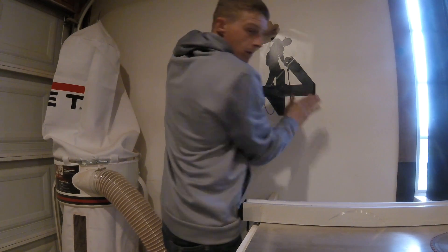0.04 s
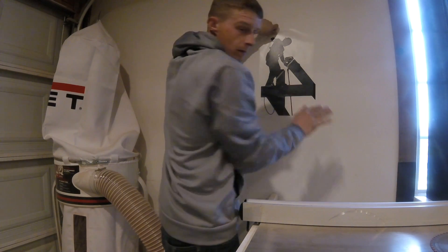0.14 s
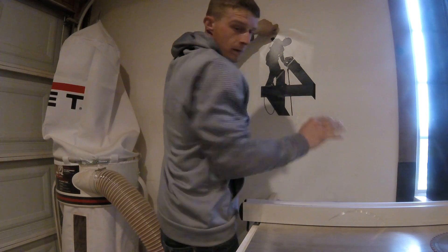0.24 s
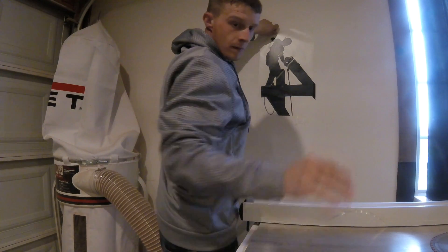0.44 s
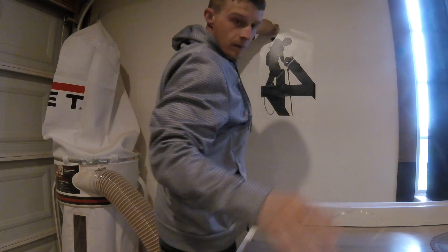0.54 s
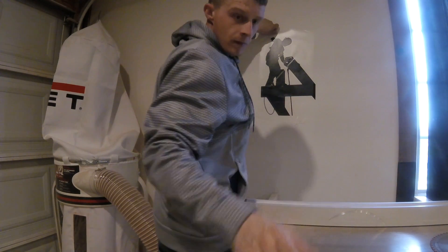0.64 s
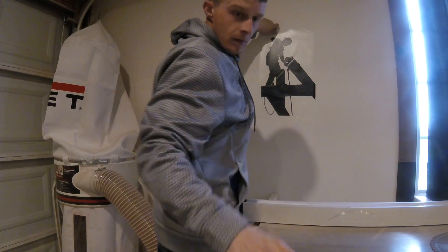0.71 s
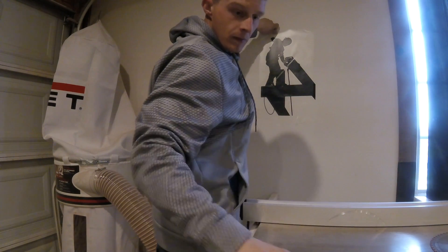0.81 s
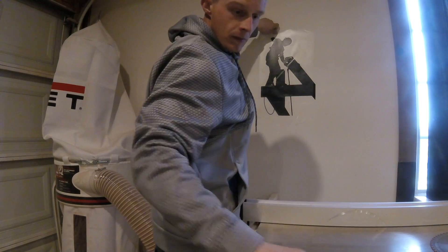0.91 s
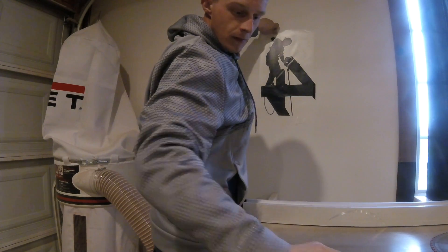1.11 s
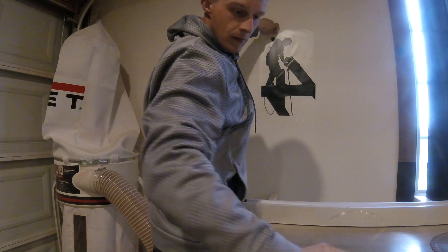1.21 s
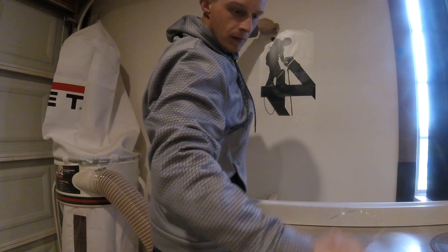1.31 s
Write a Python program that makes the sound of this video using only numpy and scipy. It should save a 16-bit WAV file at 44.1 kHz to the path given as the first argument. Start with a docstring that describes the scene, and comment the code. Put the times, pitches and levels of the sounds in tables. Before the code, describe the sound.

At about 0.2 seconds a hand slaps paper against a wall, one sharp crack with a faint short squeak and soft low bumps, ringing through a bare garage for under a second. From about 1.0 to 1.35 seconds, paper and a sleeve rustle, quieter and drier, with a few crisp crinkles and a soft bump. A faint wavering low hum, room noise and thin hiss lie underneath.

```python
"""A bare garage, heard through one microphone. A hand finishes pressing paper-backed vinyl onto the wall.
There is a short stick-slip squeak and one sharp slap, whose quick, hard contacts ring through the room.
Then paper and sleeve rustle in tiny slips, much drier than the slap, with a few crinkles and soft bumps.
Under it lie a wavering low hum, faint drones, room noise and a thin hiss."""
import sys
import numpy as np
from scipy import signal
from scipy.fft import rfft, irfft
from scipy.io import wavfile
from scipy.ndimage import uniform_filter1d

SR = 44100
rng = np.random.default_rng(int(sys.argv[2]) if len(sys.argv) > 2 else 0)


def inscribe(sig):
    """Save sig as 16-bit PCM at rate SR to the path in sys.argv[1].

    A 1-D sig is mono; a 2-D sig holds one channel per row.
    Samples are clipped to [-1, 1] before scaling.
    """
    pcm = np.round(np.clip(np.atleast_2d(sig).T, -1, 1) * 32767)
    wavfile.write(sys.argv[1], SR, pcm.astype(np.int16))


N = 59535
T = np.arange(N) / SR
FREQS = np.maximum(np.fft.rfftfreq(2 * N, 1 / SR), 1)


# The hard contacts of the slap. Each row: start in seconds, relative level in dB, decay in seconds.
SLAP_CONTACTS = [(.189, -32, 0.017), (0.2003, -7.5, 0.019), (.209, 1, 0.0035), (0.213, -1, 0.0043)]
# The slap's tone at the microphone. Each row: frequency in Hz, relative density in dB.
SLAP_SPECTRUM = [(180, -11), (255, -5.5), (370, -6.5), (460, -12.5), (590, -2.5), (700, -6), (870, 1.5),
                 (1080, -10), (1310, 2), (1640, -1.5), (1950, -9.5), (3000, -12.5), (4100, -18.5),
                 (5000, -27), (6800, -26.5), (9000, -45.5), (12000, -59.5)]
# What rings on after it. Each row: frequency in Hz, relative level in dB, t60 in seconds.
SLAP_MODES = [(338.5, -6, 0.3), (580, -5, 0.7), (609, -4, .6), (805, -4, 0.39), (945, 9, 0.49),
              (910, 4, 0.95), (1030, 7.5, 1), (1301, 5, 0.73), (1465, 9.5, 0.94), (1490, -11, 1),
              (1535, -10, 0.96), (1530, 2.5, 0.8), (1673, 5.5, 1)]

def slap(rise_s=0.0024, direct_db=-12, room_db=4.5, ring_db=-45.5):
    """A sharp slap: a few quick, hard contacts that ring through the garage."""
    cracks = 0
    for start, db, decay in SLAP_CONTACTS:
        direct = undb(direct_db) * burst(start, rise_s, decay)
        cracks += undb(db) * (direct + undb(room_db) * echoes(start))
    strongest_at = SLAP_CONTACTS[2][0]
    return colour(cracks, SLAP_SPECTRUM) + undb(ring_db) * ring(strongest_at, SLAP_MODES, rise_s)


# Rubs. Each row: start and length in seconds, pitch and its mid-stroke rise in Hz, level in dB.
RUBS = [(0.187, 0.092, 316, 70.1, -34), (1.205, 0.024, 1850, 40, -42)]

def squeaks():
    """Stick-slip tones that rise and fall with the speed of the rub."""
    tones = 0
    for start, length, hz, arch_hz, db in RUBS:
        speed = np.sin(np.pi * np.clip((T - start) / length, 0, 1))
        tones += undb(db) * np.sqrt(np.abs(speed)) * sine(hz + arch_hz * speed)
    return garage(tones, wet_db=-11)


# Paper and sleeve moving. Each row: time in seconds, relative level in dB.
RUSTLE_LEVELS = [(0, -64.5), (.12, -64.5), (.17, -57), (.22, -63), (.95, -88), (.99, -68), (1.03, -64.5),
                 (1.07, -51.5), (1.108, -43), (1.145, -43.5), (1.175, -48), (1.205, -41), (1.225, -47.5),
                 (1.257, -38.5), (1.275, -48.5), (1.32, -47), (1.35, -46.5)]
# Their tone at the microphone. Each row: frequency in Hz, relative density in dB.
RUSTLE_SPECTRUM = [(120, -35.5), (200, -9), (823, -11), (867, -10), (1070, -4), (1600, -12), (1940, -5.5),
                   (2080, -7.5), (3700, -7.5), (5520, -18), (6350, -11.5), (10200, -35), (13000, -44)]

def rustle(slips_per_s=3000, spread_db=1.5, gain_db=-0.5):
    """Dense tiny slips of paper and cloth, swelling with each movement."""
    slips = (rng.random(N) < slips_per_s / SR) * rng.choice([-1, 1], N)
    sizes = undb(spread_db * np.minimum(rng.exponential(size=N), 4))
    grains = unit(slips * sizes) * curve(RUSTLE_LEVELS)
    return garage(undb(gain_db) * colour(grains, RUSTLE_SPECTRUM), wet_db=-10)


# Crinkles, scrapes and dull taps.
# Each row: start in seconds, relative level in dB, band centre in Hz, decay in seconds.
CREASES = [(0.754, -49, 3030, 0.0022), (0.983, -57, 3460, 0.028), (1.02, -53, 2600, 0.021),
           (1.106, -36.5, 2600, 0.027), (1.144, -28, 1300, 0.0045), (1.204, -26, 1710, 0.0021),
           (1.25, -49, 1200, 0.0039), (1.259, -40, 4320, 0.0036), (1.2958, -24, 1830, 0.0021),
           (1.3007, -22, 2310, 0.0013), (1.312, -29, 3550, 0.00072), (1.339, -32.5, 1360, 0.0044),
           (1.341, -33, 290, 0.0068)]

def crinkles(rise_s=0.00098):
    """Single creases snap over or scrape briefly, each with its own pitch."""
    snaps = 0
    for start, db, hz, decay in CREASES:
        snaps += undb(db) * band(0.5 * burst(start, rise_s, decay), hz, octaves=0.49)
    return garage(snaps, wet_db=-5)


# Soft pushes on a panel. Each row: start in seconds, relative level in dB.
PUSHES = [(.236, -37), (.262, -31), (1.232, -39.5)]
# The panel's answer. Each row: frequency in Hz, relative level in dB, t60 in seconds.
PANEL_MODES = [(89.8, -2, 0.44), (149.7, -1.5, 0.2), (251, -6.5, .2)]

def bumps():
    """Soft pushes stir the low modes of a panel."""
    return sum(undb(db) * ring(start, PANEL_MODES, rise_s=0.0044) for start, db in PUSHES)


# The hum at the microphone. Each row: time in seconds, level in dB.
HUM_LEVELS = [(0, -53), (.06, -69), (.44, -58.5), (.52, -61.5), (.6, -47), (.7, -58.5), (.83, -92),
              (.9, -59), (1.03, -51), (1.17, -53.5), (1.35, -55)]

def hum():
    """A low tone swells and sinks behind the work."""
    return curve(HUM_LEVELS) * wavering_tone(130.6, drift_hz=2.1)


# Low tones in the room. Each row: frequency in Hz, level in dB, waver in dB.
DRONE_TONES = [(38.8, -52.5, 0.5), (88, -66, 2), (176.1, -62, 4)]

def drones():
    """Faint, unbroken tones waver in level and pitch."""
    return sum(undb(db + waver * walk(10)) * wavering_tone(hz, drift_hz=3.25)
               for hz, db, waver in DRONE_TONES)


# The garage's noise floor. Each row: frequency in Hz, relative density in dB.
FLOOR_SPECTRUM = [(25, 6.5), (45, -5.5), (65, -1.5), (150, -6.5), (210, -18), (300, -13.5), (480, -20),
                  (800, -21.5), (1500, -24), (2700, -29), (4000, -36), (5100, -38), (6500, -26.5),
                  (8500, -28.5), (10500, -37.5), (14000, -38)]

def room_noise(floor_db=-52.5, hiss_db=-68):
    """Steady noise, heaviest in the bass, with a narrow hiss high above it."""
    floor = colour(rng.standard_normal(N), FLOOR_SPECTRUM)
    hiss = band(rng.standard_normal(N), hz=6600, octaves=0.046)
    return undb(floor_db) * floor + undb(hiss_db) * hiss


# Reverberation between the bare walls. Each row: frequency in Hz, t60 in seconds.
GARAGE_T60 = [(100, 0.75), (400, 0.83), (1400, 0.86), (3000, 0.85), (6000, 0.65), (12000, 0.43)]

def echoes(start, build_s=0.0013):
    """The room's answer to a click: a dense tail of unit energy whose treble dies first."""
    noise = rfft(rng.standard_normal(2 * N))
    tail = 0
    for hz in 2. ** np.arange(6, 15):  # octave bands
        share = np.maximum(1 - np.abs(np.log2(FREQS / hz)), 0)
        decay_s = on_log_axis(hz, GARAGE_T60) / np.log(1000)
        tail += irfft(noise * share)[:N] * fade(start, decay_s)
    return unit(tail * (1 - fade(start, build_s))) / np.sqrt(N)


def garage(x, wet_db):
    """The direct sound reaches the microphone together with its reverberation."""
    return x + undb(wet_db) * signal.fftconvolve(x, echoes(0))[:N]


def ring(start, modes, rise_s):
    """Damped modes set going by a push that takes rise_s to build."""
    ringing = 0
    for hz, db, t60 in modes:
        phase = 2 * np.pi * (hz * (T - start) + rng.random())
        ringing += undb(db) * fade(start, t60 / np.log(1000)) * np.sin(phase)
    return (1 - fade(start, rise_s)) * ringing


def burst(start, rise_s, decay_s):
    """White noise that builds and dies away."""
    return fade(start, decay_s) * (1 - fade(start, rise_s)) * rng.choice([-1, 1], N)


def fade(start, decay_s):
    """Sudden start and exponential decay."""
    return (T >= start) * np.exp(-np.maximum(T - start, 0) / decay_s)


def sine(hz):
    """A sine that follows a moving pitch."""
    return np.sin(2 * np.pi * np.cumsum(hz) / SR)


def wavering_tone(hz, drift_hz):
    """A tone of unit rms whose pitch wanders."""
    return np.sqrt(2) * sine(hz + drift_hz * walk(13.78))


def walk(steps_per_s):
    """Smooth random motion of unit rms."""
    hold = int(SR / steps_per_s)
    steps = rng.standard_normal(N)[np.arange(N) // hold]
    return unit(uniform_filter1d(uniform_filter1d(steps, hold), hold))


def colour(x, rows):
    """Causal filter of unit power gain and given (Hz, dB) shape, falling away below the first point."""
    bass_cut = np.hypot(1, (rows[0][0] / FREQS) ** 2)
    gain = unit(undb(on_log_axis(FREQS, rows)) / bass_cut)
    cepstrum = irfft(np.log(gain))
    cepstrum[1:N] *= 2  # minimum phase: nothing sounds ahead of a hit
    cepstrum[N + 1:] = 0
    return irfft(rfft(x, 2 * N) * np.exp(rfft(cepstrum)))[:N]


def band(x, hz, octaves):
    """Bell-shaped band filter of unit power gain."""
    bell = np.exp(-.5 * (np.log2(FREQS / hz) / octaves) ** 2)
    return irfft(rfft(x, 2 * N) * unit(bell))[:N]


def curve(rows):
    """Gain over time from (s, dB) points."""
    return undb(np.interp(T, *np.array(rows).T))


def on_log_axis(hz, rows):
    """Read (Hz, value) points on a log-frequency axis."""
    freqs, values = np.array(rows).T
    return np.interp(np.log(hz), np.log(freqs), values)


def undb(db):
    """Decibels to gain."""
    return 10 ** (np.asarray(db) / 20)


def unit(x):
    """Scale to an rms of one."""
    return x / np.sqrt(np.mean(x ** 2))


def scene():
    """The work and the room behind it, at one microphone."""
    foreground = slap() + squeaks() + bumps() + rustle() + crinkles()
    return (foreground + hum() + drones() + room_noise())[None]


def record(dry, top_hz=13900):
    """The camera cuts the highest treble steeply."""
    return signal.sosfilt(signal.ellip(8, .2, 70, top_hz, fs=SR, output="sos"), dry)


dry = scene()
out = record(dry)
inscribe(out)
```